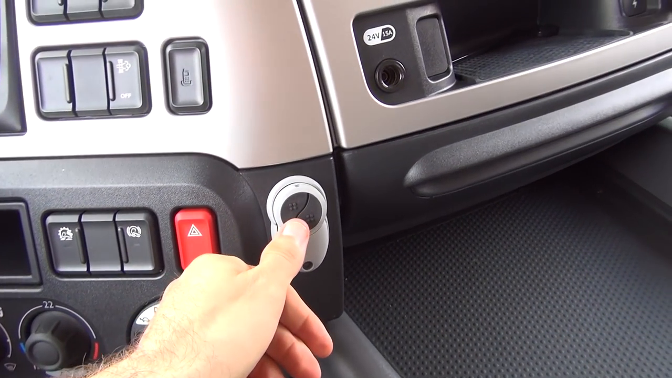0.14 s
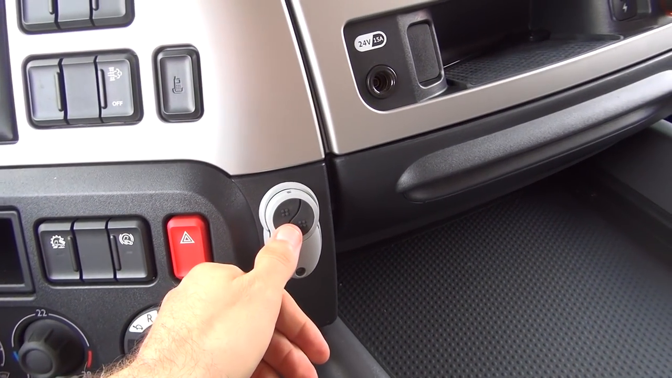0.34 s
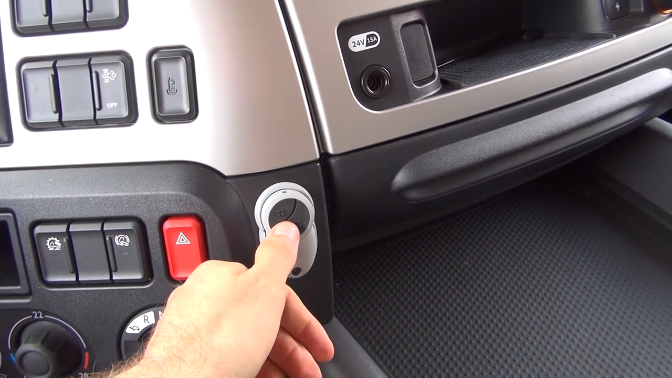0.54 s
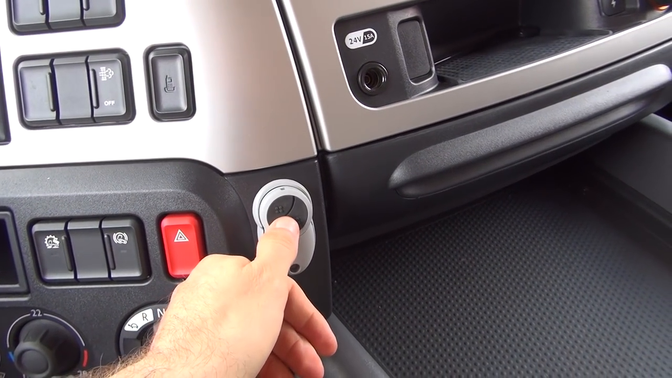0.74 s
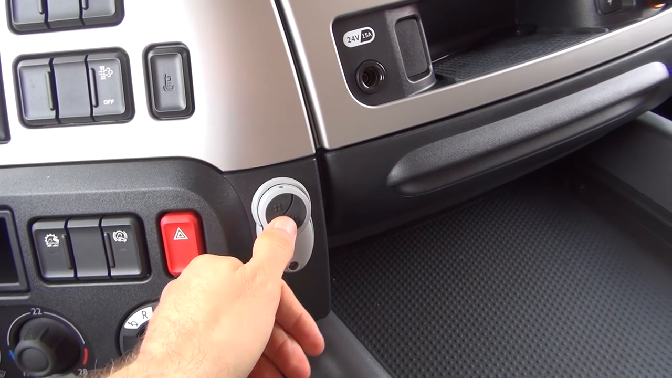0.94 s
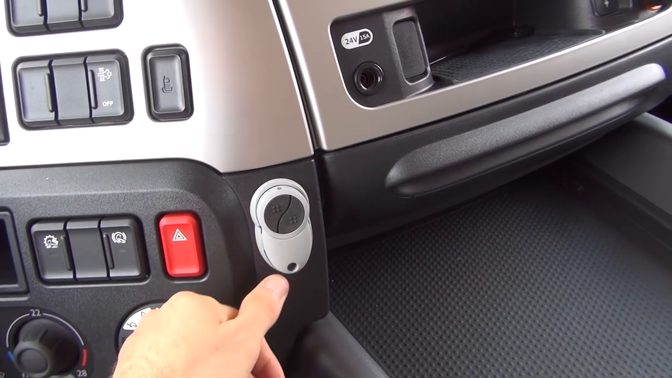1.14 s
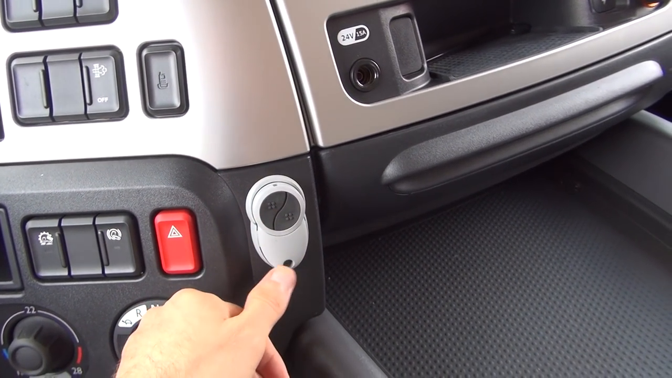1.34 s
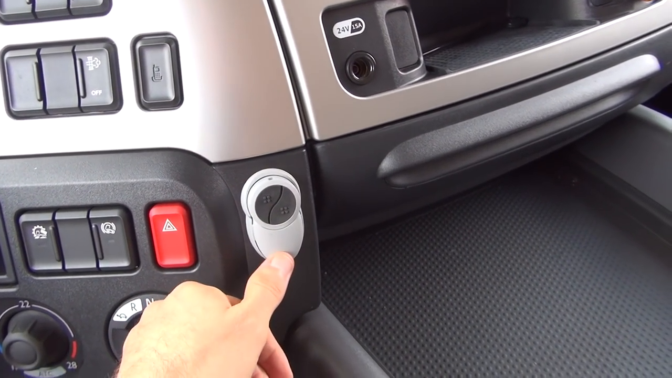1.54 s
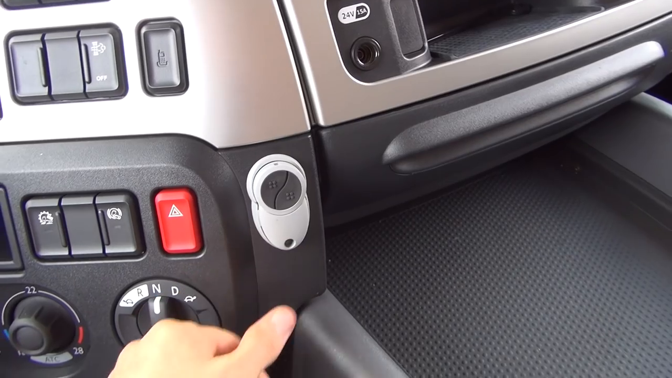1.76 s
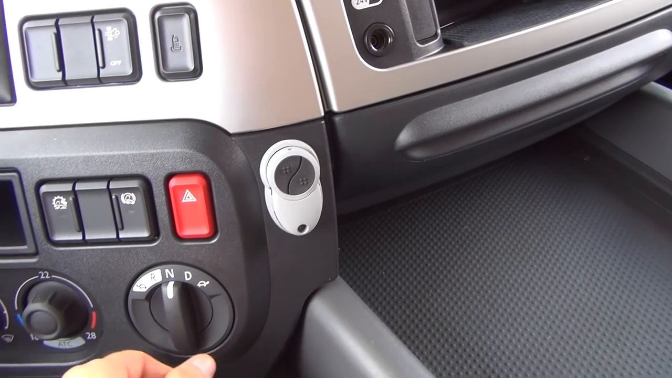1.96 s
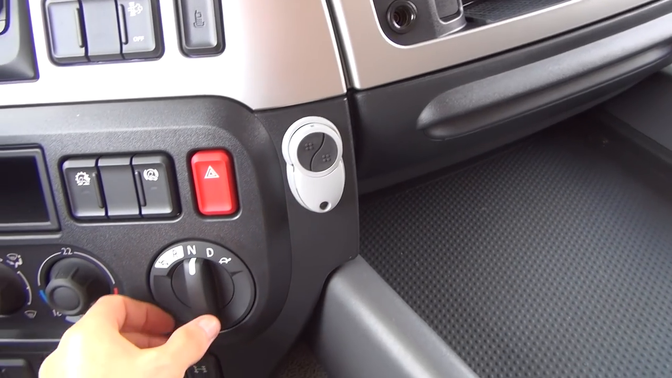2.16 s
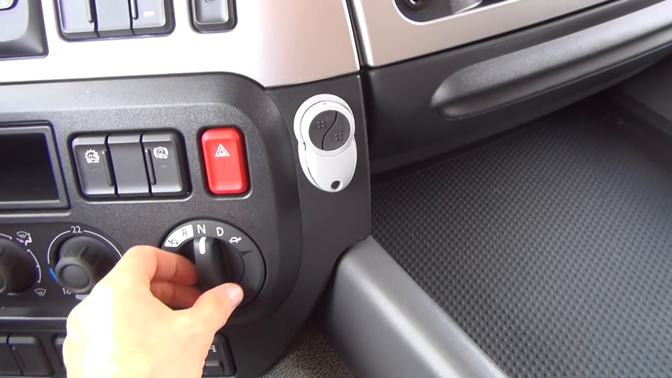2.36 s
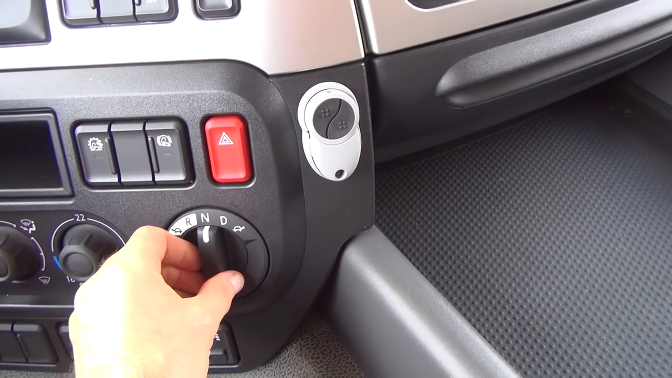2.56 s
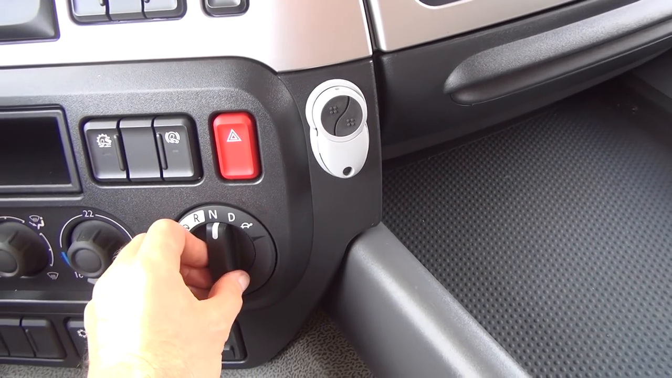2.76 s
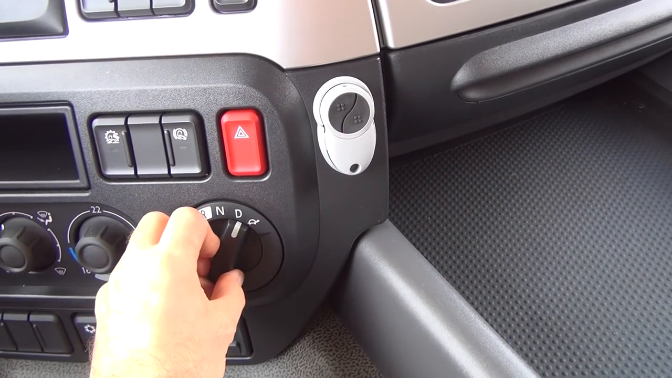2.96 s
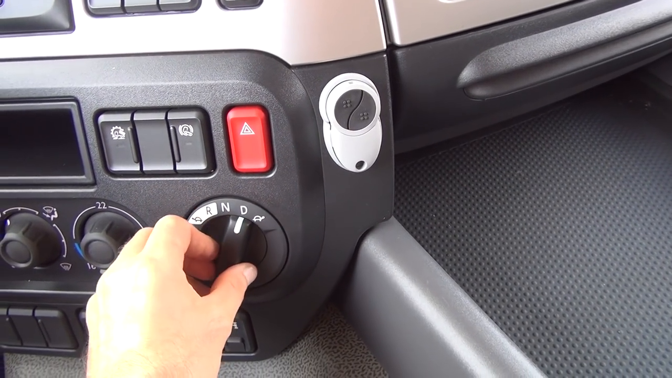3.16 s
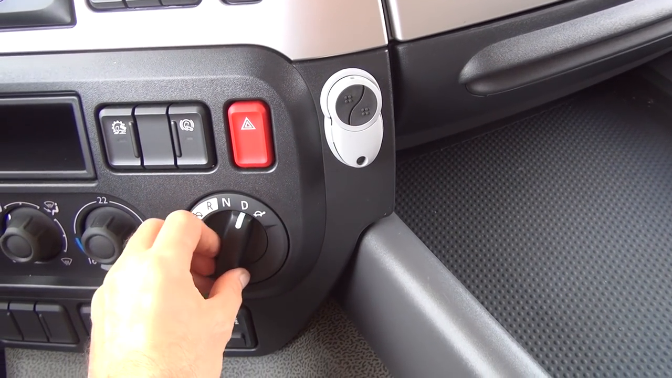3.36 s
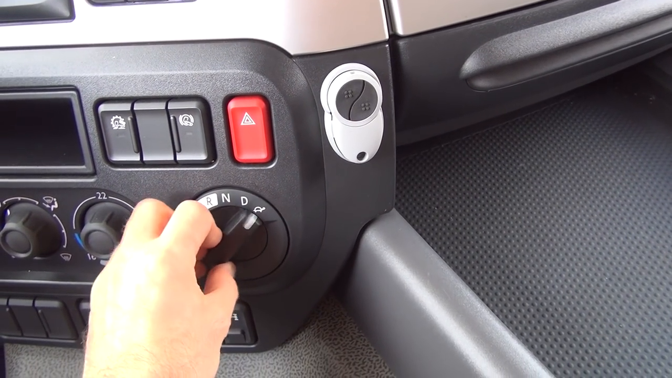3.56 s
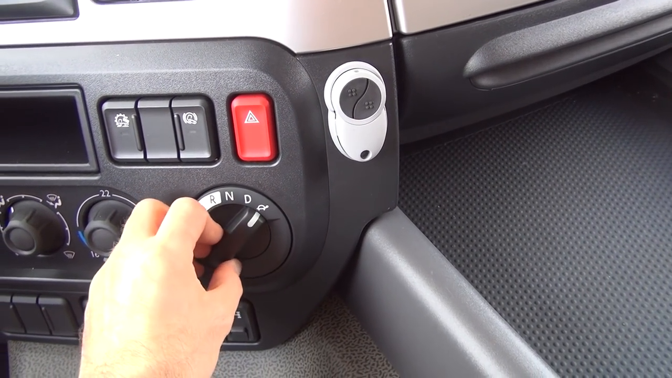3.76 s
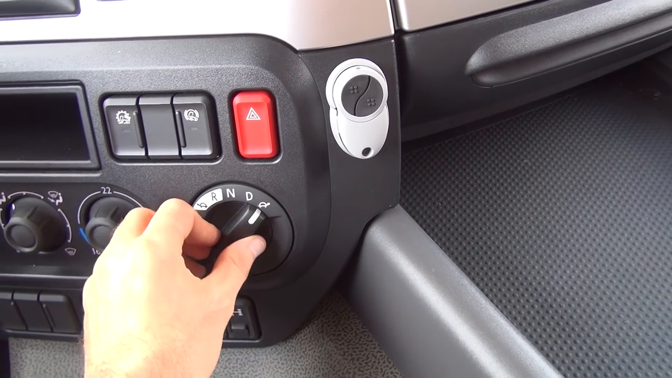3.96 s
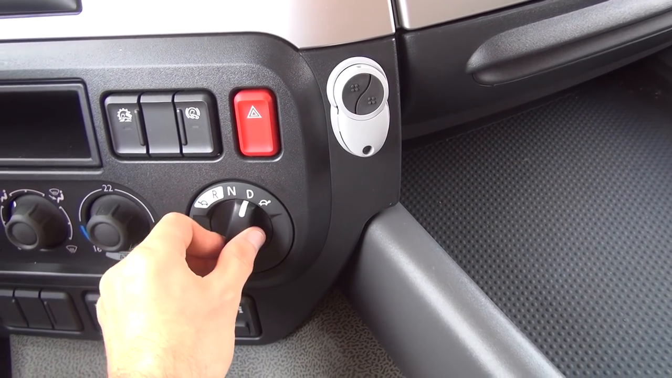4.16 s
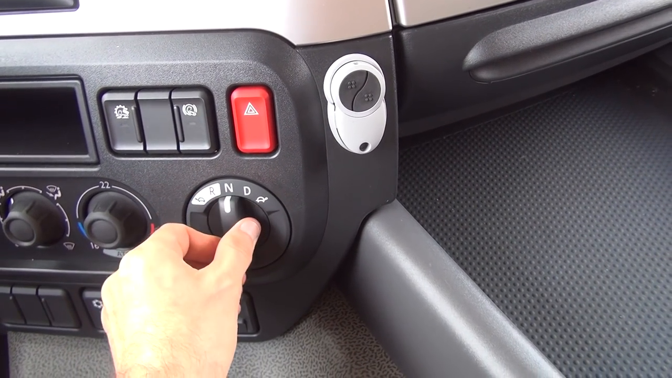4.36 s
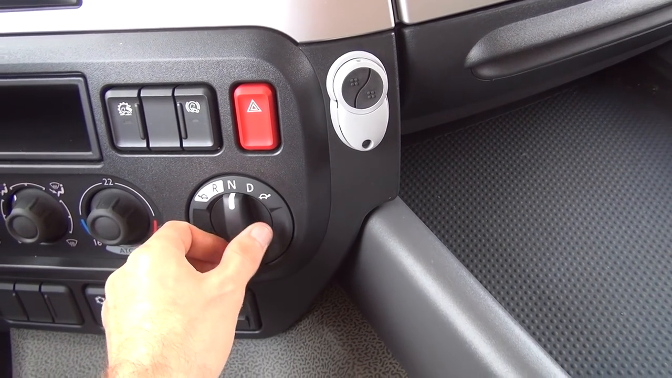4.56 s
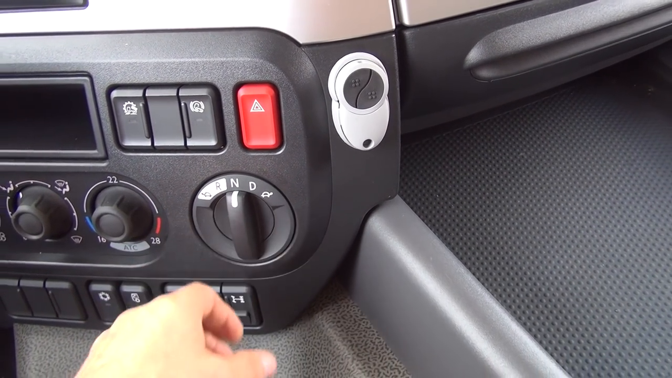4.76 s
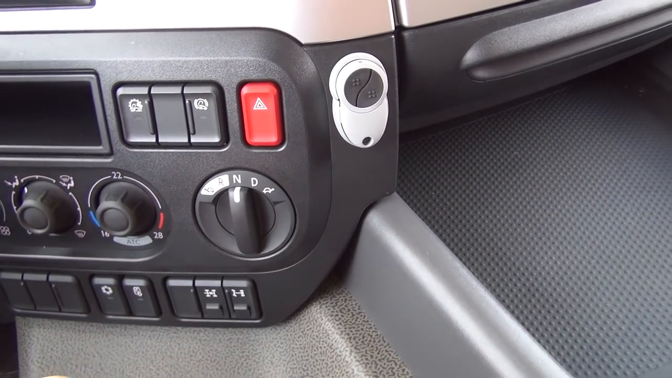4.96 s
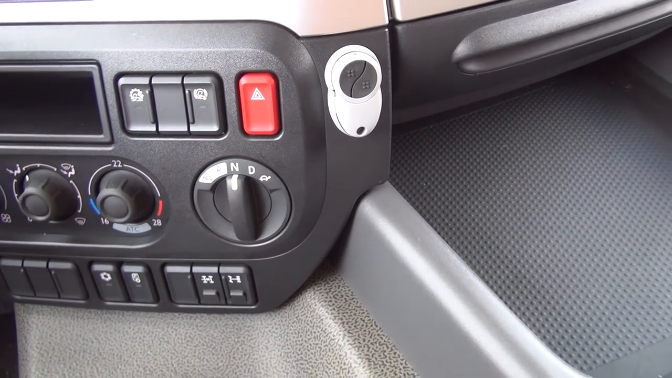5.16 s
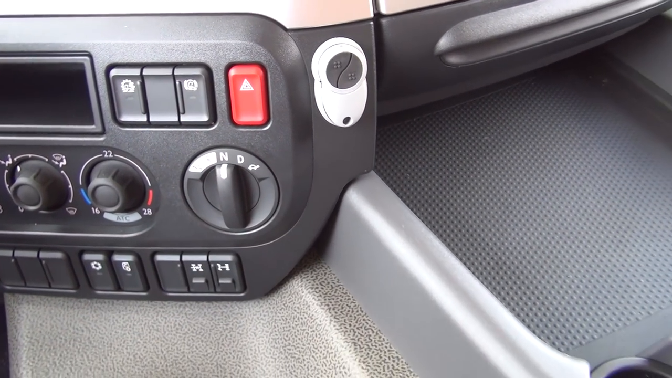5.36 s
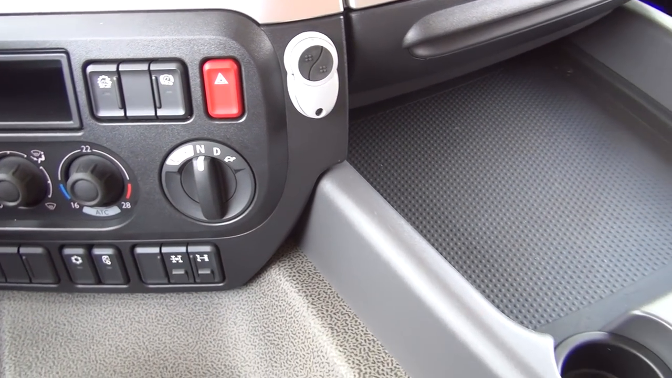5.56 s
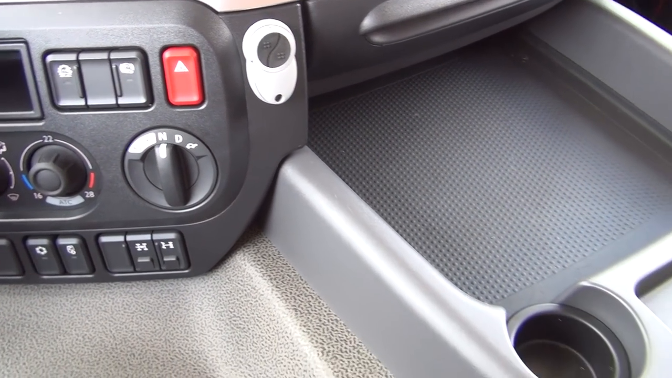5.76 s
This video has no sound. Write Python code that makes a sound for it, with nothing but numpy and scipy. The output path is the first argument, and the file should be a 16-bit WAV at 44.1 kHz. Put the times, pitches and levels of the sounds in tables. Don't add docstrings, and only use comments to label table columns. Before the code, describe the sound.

Light plastic clicks from a small cap, then four loud, sharp rotary-knob snaps with finger rubs, over low rumble in a parked truck cab.

```python
import sys
import numpy as np
from scipy import signal
from scipy.fft import rfft, irfft, next_fast_len
from scipy.io import wavfile
from scipy.ndimage import uniform_filter1d, minimum_filter1d

SR = 44100
rng = np.random.default_rng(int(sys.argv[2]) if len(sys.argv) > 2 else 0)


def rack_gain(trim_db):
    fader = np.asarray(trim_db, float)
    return 10 ** (fader / 20)


def master_out(mix):
    frames = np.transpose(np.atleast_2d(mix))
    ceiling = np.clip(frames, -1, 1)
    pcm = np.round(ceiling * 32767).astype(np.int16)
    wavfile.write(sys.argv[1], SR, pcm)


N = 256212
T = np.arange(N) / SR

# (centre [Hz], width [Hz], level [dB])
KNOB_EDGES = [(8090, 1840, -1), (8400, 1290, 5), (10910, 760, 8.5), (13540, 700, 5.5), (13600, 3100, 0)]
# (centre [Hz], width [Hz], level [dB])
KNOB_BODY = [(1850, 93, -11), (3070, 910, -3.5), (3240, 720, -2), (3725, 140, -5.5), (4550, 1030, -16.5),
             (5550, 1500, -17.5)]
# (centre [Hz], width [Hz], level [dB])
DASHBOARD = [(236, 55, 0), (417, 84, -3), (583.5, 23, 4.5), (689, 43, 1.5), (795, 86, 1.5), (1087, 63, 0.5),
             (1320, 80, -4), (1604, 120, -4)]
# (centre [Hz], width [Hz], level [dB])
CAP_SEAT = [(1786, 42, -0.5), (2320, 580, -10), (3450, 870, -4), (4150, 1200, -5), (5800, 330, 2.5)]
# (time [s], energy [dB], hold [s], brightness [dB per octave])
RATTLES = [
    (2.935, 14.5, 0.023, -3),
    (3.621, 14, 0.0056, 2),
    (4.077, 15.5, 0.032, -4.5),
    (4.295, 14, 0.033, 2),
]


def unit(x):
    return x / np.sqrt(np.mean(x ** 2) + 1e-20)


def along(points, hz):
    f, v = np.transpose(points)
    return np.interp(np.log(hz + 1), np.log(f + 1), v)


def filtered(x, response):
    n = x.shape[-1]
    m = next_fast_len(n + 2048)
    return irfft(rfft(x, m) * response(np.fft.rfftfreq(m, 1 / SR)), m)[..., :n]


def ringing(x, modes):
    def response(f):
        h = 0
        for k, (centre, width, db) in enumerate(modes):
            damping = 1j * f * width
            h = h + (-1) ** k * rack_gain(db) * damping / (centre * centre - f * f + damping)
        return h / np.sqrt(np.mean(abs(h) ** 2))
    return filtered(x, response)


def resonance(x, hz, width):
    return unit(signal.lfilter(*signal.iirpeak(hz, hz / width, SR), x))


def wobble(rate):
    knots = rng.standard_normal(int(N * rate / SR) + 2)
    return 1.2 * np.interp(T * rate, np.arange(len(knots)), knots)


def noise(spectrum):
    return unit(filtered(rng.standard_normal((2, N)), lambda hz: rack_gain(along(spectrum, hz))))


def patchy(x, depth_db):
    z = signal.stft(x, nperseg=4096)[2]
    field = rng.standard_normal(z.shape[1:])
    field = uniform_filter1d(uniform_filter1d(field, size=3, axis=0), size=6, axis=1)
    return unit(signal.istft(z * rack_gain(depth_db * unit(field)), nperseg=4096)[1][:, :N])


def cab(x, knee):
    # (frequency [Hz], 60 dB decay time [s])
    decay_times = [(300, 0.16), (800, 0.13), (3000, 0.14), (6000, 0.13), (9000, 0.13), (12500, 0.09),
                   (15500, 0.11)]
    hz, t, z = signal.stft(rng.standard_normal((2, SR // 5)), SR, nperseg=128)
    late = np.sqrt(t ** 2 + knee ** 2) - abs(knee)
    tail = signal.istft(z * rack_gain(-60 * late / along(decay_times, hz)[:, None]), SR, nperseg=128)[1]
    age = np.arange(tail.shape[1]) / SR
    tail = tail * (1 - np.exp(-(age / 0.00068) ** 2))
    return signal.fftconvolve(x[None], tail / np.linalg.norm(tail[0]), axes=1)


def clicks(table, edges, shell, gain_db, rise_ms, detune, knee):
    out = np.zeros((2, N + SR))
    t = np.arange(SR // 20) / SR
    for s, db, shell_db, panel_db, chatter_ms, wet_db in table:
        envelope = np.exp(-1000 * t / max(chatter_ms / 2, .1)) * (1 - np.exp(-1000 * t / rise_ms))
        chatter = rng.standard_normal((3, len(t))) * envelope
        shift = 1 + detune * rng.standard_normal((3, 8))
        hit, spread = 0, 0
        parts = zip(chatter, (edges, shell, DASHBOARD), shift, (0, shell_db, panel_db))
        for contacts, modes, factors, part_db in parts:
            detuned = [(hz * k, w, d) for (hz, w, d), k in zip(modes, factors)]
            near, all_ways = ringing(np.array([contacts, t == 0]), detuned)
            near *= rack_gain(db + gain_db + part_db) / abs(near).max()
            hit = hit + near
            spread = spread + all_ways * np.linalg.norm(near)
        wet = rack_gain(wet_db) * cab(spread, knee)
        wet[:, :len(t)] += hit * [[1], [.6]]
        out[:, round(s * SR):][:, :wet.shape[1]] += wet
    return out[:, :N]


def cab_rumble():
    # (time [s], strength [dB])
    rumble = [(0.0, -47), (0.56, -45.5), (0.69, -48.5), (1.03, -44.5), (1.21, -48), (2.1, -46),
              (2.38, -44.5), (3.22, -45.5), (3.4, -49), (3.87, -44), (4.21, -48.5), (4.48, -45.5),
              (4.66, -47.5), (5.13, -45), (5.29, -42.5), (5.81, -45.5)]
    # (frequency [Hz], density [dB per Hz])
    boom_spectrum = [(12, -50), (20, -7), (37, -20.5), (49, -10), (67, -14.5), (92, 6), (111, 3), (120, 1),
                     (130, -31), (140, -27), (180, -19), (310, -120)]
    # (frequency [Hz], density [dB per Hz])
    drone_spectrum = [(79, -33), (135, -8.5), (167, 3.5), (194, -7), (233, -5), (255, -8.5), (274, -19.5),
                      (296, -10.5), (376, -20), (411, -16.5), (560, -26.5), (730, -76), (1230, -120)]
    strength_db = np.interp(T, *np.transpose(rumble))
    drone_db = -48 + 0.034 * (strength_db - strength_db.mean())
    boom = rack_gain(strength_db + 3.8) * noise(boom_spectrum)
    return boom + rack_gain(drone_db) * patchy(noise(drone_spectrum), depth_db=2.5)


def traffic():
    # (frequency [Hz], density [dB per Hz])
    spectrum = [(200, -15), (400, -1), (1000, -9), (3000, -15), (6000, -20), (12000, -66)]
    leaving_db = 5 * np.exp(-T / 0.22)
    coming_db = 6 * np.exp((T - T[-1]) / 0.3)
    return rack_gain(-60 + leaving_db + coming_db + 1.5 * wobble(4.57)) * noise(spectrum)


def electronics():
    # (frequency [Hz], density [dB per Hz])
    hiss_spectrum = [(240, -15), (400, -2.5), (446, -11.5), (588, -4), (1310, -20.5), (1630, -13.5),
                     (1990, -17.5), (9180, -17.5), (9920, -16), (16000, -17.5)]
    # (frequency [Hz], level [dB])
    whine_lines = [(9798, -90), (9851, -85), (10051, -78.5), (10099, -75), (10250, -93)]
    # (time [s], length [s], frequency [Hz], level [dB])
    storage = [
        (1.112, .07, 11000, -63),
        (5.312, .07, 11000, -63),
    ]
    whine = sum(rack_gain(db + 6.5) * np.sin(2 * np.pi * (hz * T + rng.random())) for hz, db in whine_lines)
    blips = 0
    for s, length, hz, db in storage:
        switched_on = abs(T - s - length / 2) < length / 2
        blips = blips + rack_gain(db) * switched_on * np.sin(2 * np.pi * hz * T)
    return rack_gain(-56.5) * noise(hiss_spectrum) + (whine + blips) * [[1], [0]]


def hums():
    # (centre [Hz], width [Hz], level [dB], start [s], end [s])
    engine_notes = [
        (26.8, 2.4, -65, -1, 4.95),
        (220.6, 9.7, -56, 1, 3.8),
        (246.3, 5.7, -62, 4.5, 5.2),
        (438, 28, -56.5, 4, 4.58),
        (297.5, 11, -60.5, -0.5, 0.76),
    ]
    total = 0
    for hz, width, db, start, end in engine_notes:
        fade = np.clip(np.minimum(T - start, end - T) / 0.17 + .5, 0, 1)
        source = resonance(rng.standard_normal(N), hz, width)
        total = total + rack_gain(db) * fade * resonance(source, hz, width)
    return total * [[1], [.8]]


def cap_flips():
    # (time [s], peak [dB], seat [dB], panel [dB], chatter [ms])
    contacts = [(0.3, -23, -10, -24, 1.2), (0.3145, -26, -17, -17.5, 1.6), (0.336, -14, -19.5, -34, 2.9),
                (0.5591, -30.5, -8.5, -22, 3.3), (0.611, -13.5, -16.5, -24, 5.9),
                (0.6948, -35.5, -3, -13, 1), (0.7155, -17.5, -36, -39, 1.05),
                (0.7791, -22.5, -9.5, -19.5, 4), (0.997, -58, 7, 15, 2.6), (1.0113, -35.5, 1, -15, 0.91),
                (1.3405, -19.5, -9, -19.5, 0.6), (1.5179, -12.5, -6, -23, 2.8),
                (1.522, -17.5, -10, -18, 1.6), (1.694, -31, -1, -4, 3.9), (1.6995, -32, -1.5, 0.5, 2.1),
                (1.8844, -51.5, -9, 4.5, 1.5), (2.0336, -50, 2, -17, 1.3)]
    # (centre [Hz], width [Hz], level [dB])
    lid = [(7900, 2570, -5.5), (9900, 2000, 1.5), (11320, 2270, 5.5), (12100, 3200, 1), (15800, 4100, -9)]
    flips = [(*row, 0.5 + 0.35 * row[3]) for row in contacts]
    return clicks(flips, lid, CAP_SEAT, gain_db=.5, rise_ms=.1, detune=.015, knee=.003)


def flickering(drive, modes, depth_db):
    total = 0
    for hz, width, db in modes:
        level = rack_gain(db + depth_db * wobble(35))
        total = total + level * resonance(drive * rng.standard_normal(N), hz, width)
    return unit(total)


def rubbing():
    # (time [s], length [s], first level [dB], last level [dB], shell [dB])
    strokes = [(1.006, .012, -47, -47, -15), (1.02, 0.022, -44, -36, -6.5), (1.388, 0.012, -54, -45, -8),
               (2.225, 0.036, -49.5, -51.5, 4), (2.272, 0.082, -43, -45.5, 0.5),
               (2.38, 0.012, -48, -50, 2.5), (2.416, 0.023, -53, -51.5, -1.5),
               (2.803, 0.014, -52, -47.5, 2.5), (2.841, .038, -59, -57, 0),
               (2.882, 0.032, -45.5, -46.5, -4.5), (3.079, 0.0075, -43, -38.5, 3.5),
               (3.096, 0.029, -53, -62, 12), (3.164, 0.085, -50, -52.5, 1.5),
               (3.378, .012, -52, -52.5, 3.5), (3.491, .058, -46.5, -50.5, -1),
               (3.871, 0.022, -45.5, -56, -2), (4.038, .031, -49.5, -44, 3.5),
               (4.25, 0.026, -42.5, -49, -2), (4.461, 0.014, -58.5, -68, 14.5),
               (4.502, 0.019, -60, -73, 12), (4.659, 0.021, -38, -41.5, 0.5), (4.676, 0.027, -57, -79, 15)]
    # (time [s], end level [dB], rise [dB per ms], hang [ms])
    cam_climbs = [
        (2.933, -24, 2.5, 3),
        (3.6177, -25, 2.5, 4),
        (4.079, -20, 4, 0),
        (4.2905, -26, 2.5, 3),
    ]
    # (centre [Hz], width [Hz], level [dB])
    rim = [(7600, 5100, -16), (8450, 550, -5.5), (9400, 260, -3), (11000, 730, 1.5), (12700, 700, -12),
           (12900, 400, -1), (15100, 1700, -9)]
    # (centre [Hz], width [Hz], level [dB])
    held_knob = [(700, 60, -6), (1120, 50, -3), (1550, 55, -3), (2020, 70, -1), (2680, 70, -2),
                 (3280, 95, -1), (3830, 80, -2), (4610, 130, -5), (5400, 200, -8), (6120, 110, -7)]
    catch_db_per_ms, slip_db_per_ms = 7, 1.7
    hiss, shell = np.zeros(N), np.zeros(N)
    for s, length, first_db, last_db, shell_db in strokes:
        early_ms = 1000 * np.maximum(s - T, 0)
        late_ms = 1000 * np.maximum(T - s - length, 0)
        stroke_db = np.interp(T, [s, s + length], [first_db, last_db])
        stroke = rack_gain(stroke_db - catch_db_per_ms * early_ms - slip_db_per_ms * late_ms)
        hiss += stroke
        shell += rack_gain(shell_db) * stroke
    for s, db, rise, hang_ms in cam_climbs:
        climb = (T < s) * rack_gain(db - rise * np.maximum(1000 * (s - T) - hang_ms, 0))
        hiss += climb
        shell += 0.93 * climb
    slips = rack_gain(1.6 * wobble(80) + 3 * wobble(400))
    edge = flickering(slips, rim, depth_db=3)
    knob = flickering(slips, [(hz, 2.2 * w, db) for hz, w, db in held_knob], depth_db=2.5)
    seat = flickering(slips, CAP_SEAT[1:], depth_db=2)
    body = np.where(T < 2.1, seat, knob)
    dry = hiss * edge + shell * body
    return rack_gain(-3.0) * (dry * [[1], [.6]] + rack_gain(-2.5) * cab(dry, knee=0.0018)[:, :N])


def finger_taps():
    # (time [s], peak [dB], shell [dB], panel [dB])
    contacts = [(2.2242, -42, -18, 1), (2.2413, -43, -12, -7), (2.35, -43, 9, -11), (2.3746, -44, 0, 1),
                (2.6218, -51, 4, 0), (2.6653, -35.5, -9, -30), (2.6766, -40, -7, -2), (3.089, -25, 4.5, -9),
                (3.0929, -38, 11, 3.5), (3.1462, -41.5, 3, -5), (3.1665, -37, 4, 0), (3.378, -48, -8, -5),
                (3.7623, -53, 9.5, 1), (3.801, -49, 4, -1), (3.8693, -39, -20, -2.5),
                (4.4553, -32, -2, -4.5), (4.4974, -61.5, 14, 17.5), (4.5491, -47, -3, -8),
                (4.5984, -44, -25, -21), (4.6581, -37, 1, -14), (4.665, -48, 0, 2)]
    taps = [(*row, 2.6, -5) for row in contacts]
    return clicks(taps, KNOB_EDGES, KNOB_BODY, gain_db=0.3, rise_ms=1.0, detune=0.026, knee=0.0024)


def detent_snaps():
    # (time [s], edge peak [dB], shell peak [dB])
    drops = [(2.9331, 0, -6.5), (2.9366, 1, -8), (2.9410, -7, -7), (3.6177, 0, -8), (3.6200, -4, -9),
             (3.6245, -7, -8), (4.0788, -9, -16), (4.0809, 1, -12), (4.2906, -10, -19), (4.2921, -2, -14),
             (4.2945, -5, -14)]
    panel_db, chatter_ms, cab_db = -34, 3.5, -20
    bounces = [(s, db, shell_db - db, panel_db - db, chatter_ms, cab_db) for s, db, shell_db in drops]
    return clicks(bounces, KNOB_EDGES, KNOB_BODY, gain_db=1.2, rise_ms=.25, detune=.015, knee=.004)


def hollow():
    # (centre [Hz], width [Hz], level [dB])
    walls = [(7480, 830, -5), (9030, 840, 0.5), (10540, 1630, 0.5), (11450, 1150, 4), (12650, 1500, -1),
             (14500, 1400, -6)]
    # (centre [Hz], width [Hz], level [dB])
    housing = [(2110, 280, -7), (2180, 250, -5.5), (2780, 400, -6), (3320, 35, -0.5), (3474, 79, 3),
               (3610, 490, -5), (4600, 440, -6), (5700, 750, -8)]
    out = np.zeros((2, N))
    pulse = np.arange(SR // 20) == 0
    for s, db, hold, tilt_db in RATTLES:
        edges = [(hz, w, d + tilt_db * np.log2(hz / 10000)) for hz, w, d in walls]
        colour = ringing(pulse, edges)
        colour = colour + rack_gain(-8) * ringing(pulse, housing) + rack_gain(-15) * ringing(pulse, DASHBOARD)
        wet = rack_gain(db) * cab(colour, hold)
        out[:, round(s * SR):][:, :wet.shape[1]] += wet
    return out * rack_gain(1.15 * wobble(300))


def jolts():
    frame_sways = [
        [34],
        [52],
    ]
    t = np.maximum(T - np.array(RATTLES)[:, :1] - .004, 0)
    sway = sum(np.sin(2 * np.pi * hz * t) for hz, in frame_sways)
    swing = rack_gain(-40 - 60 * t / 0.5) * sway * (1 - np.exp(-t / 0.042))
    return swing.sum(0) * [[1], [.5]]


def scene():
    # (frequency [Hz], level [dB])
    side_level = [(30, -11), (60, -25), (400, -15.5), (1400, -17.5), (2400, -31), (4400, -25), (5400, -6),
                  (7000, -6.5), (8500, -15.5), (11000, -21.5), (15000, -38)]
    # (frequency [Hz], share [1])
    mid_share = [(25, -0.4), (52, -0.44), (75, 0.13), (200, -0.011), (700, -0.062), (3000, 0.11),
                 (6000, -0.047), (12000, 0.029)]
    surroundings = cab_rumble() + traffic() + electronics() + hums()
    hand = cap_flips() + rubbing() + finger_taps()
    selector = detent_snaps() + hollow() + jolts()
    mid, seed = surroundings + hand + selector
    side = filtered(seed, lambda hz: rack_gain(along(side_level, hz)))
    side = side + filtered(mid, lambda hz: along(mid_share, hz))
    return np.array([mid + side, mid - side])


def roll_off(x):
    return signal.sosfilt(signal.butter(12, 16820, fs=SR, output="sos"), x)


def record(dry):
    need_db = np.minimum(0, -.9 - 20 * np.log10(abs(dry).max(0) + 1e-9))
    climb_db = 120 * T
    gain_db = climb_db + np.minimum.accumulate(minimum_filter1d(need_db, size=41) - climb_db)
    held = dry * rack_gain(uniform_filter1d(gain_db, size=21))
    band_hz, band_db = [15500, 15950, 16900, 16900], [0.5, -26, -31, -90]
    mix = filtered(held, lambda hz: rack_gain(np.interp(hz, band_hz, band_db)))
    return roll_off(mix)


dry = scene()
out = record(dry)
master_out(out)
```